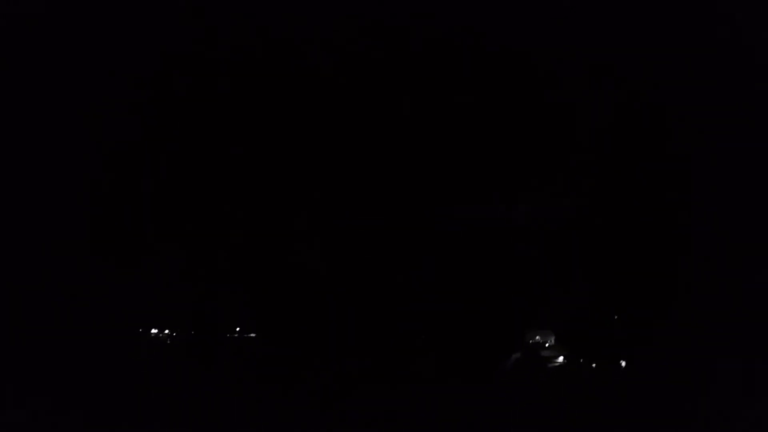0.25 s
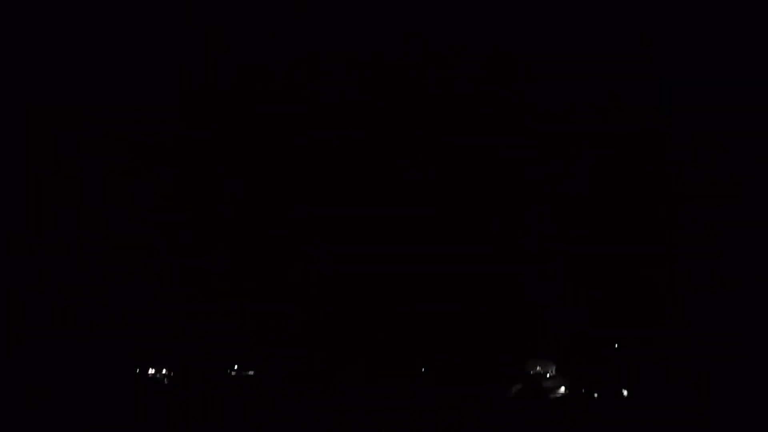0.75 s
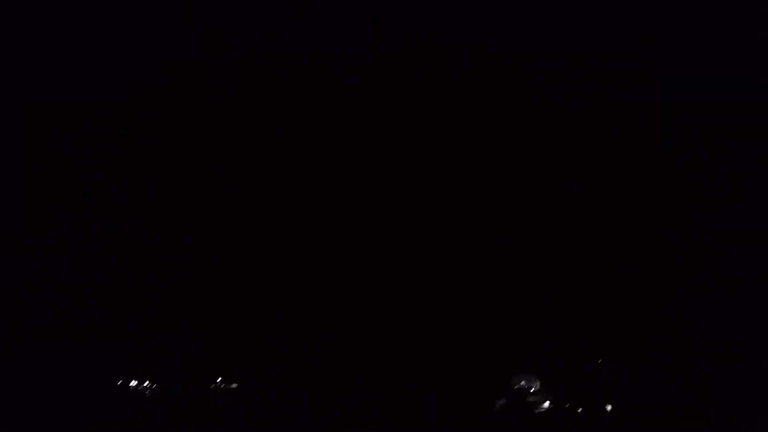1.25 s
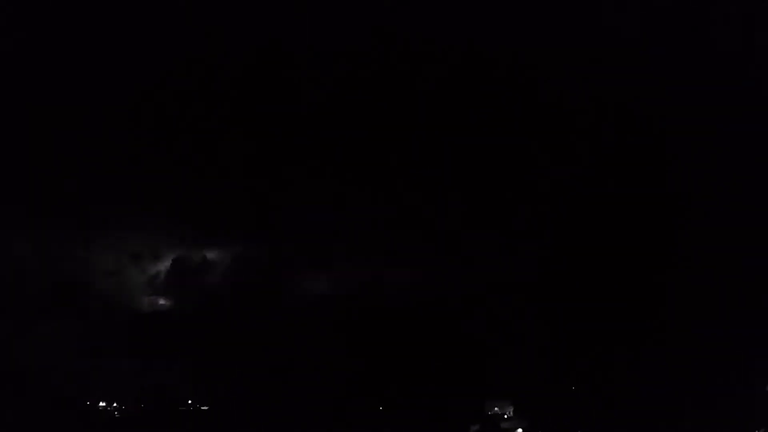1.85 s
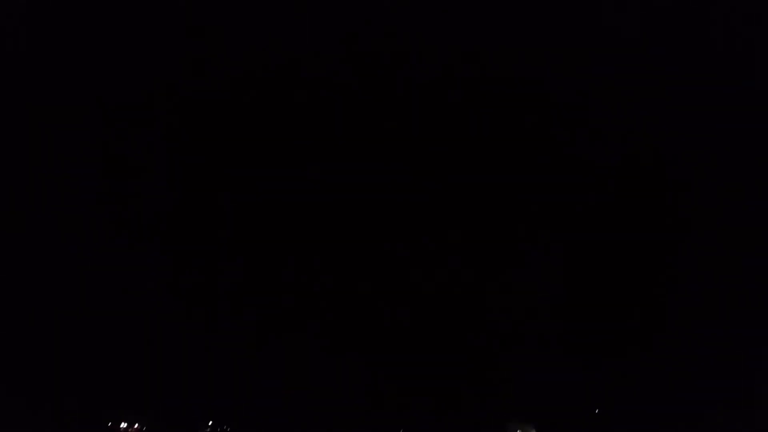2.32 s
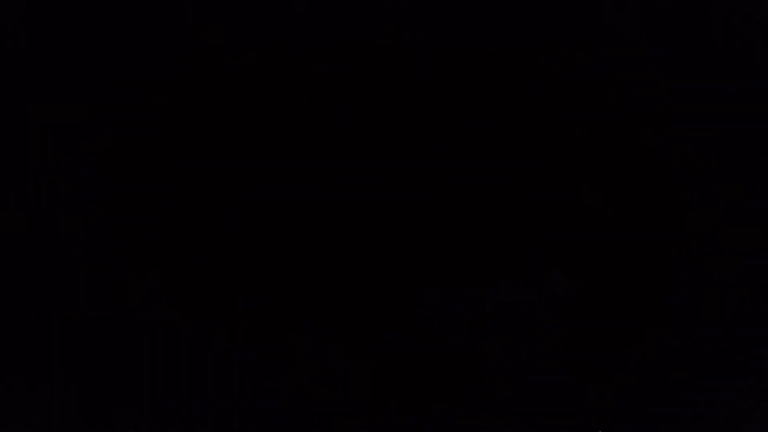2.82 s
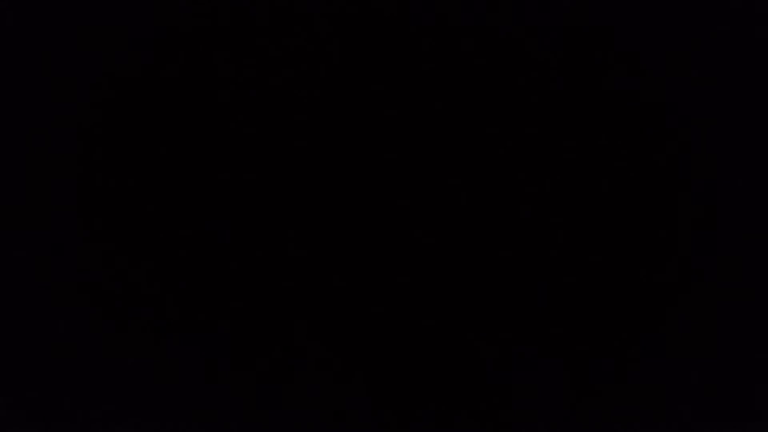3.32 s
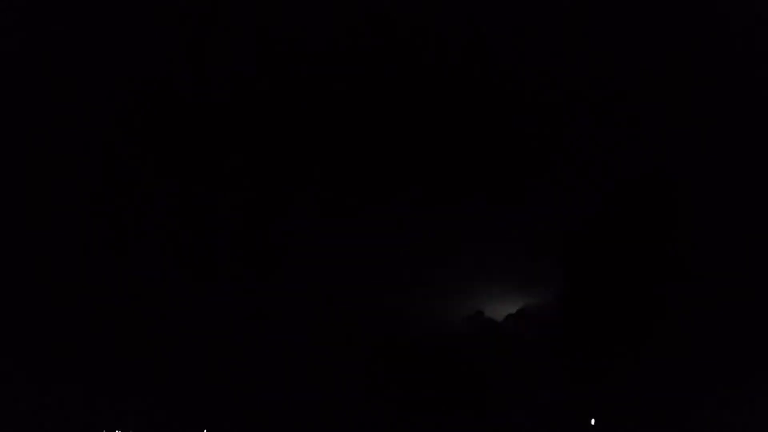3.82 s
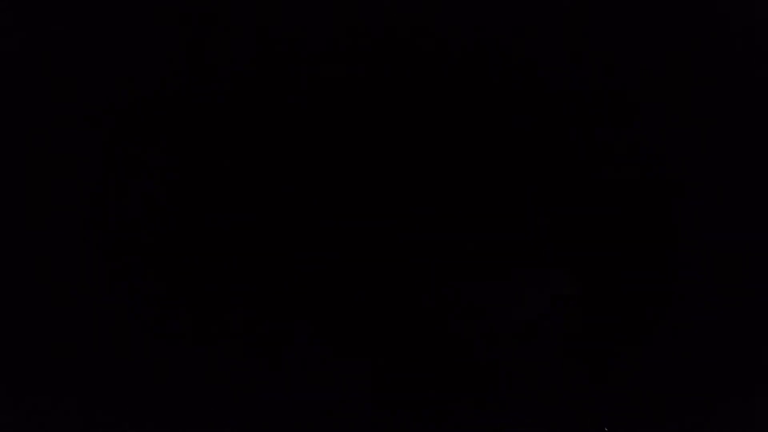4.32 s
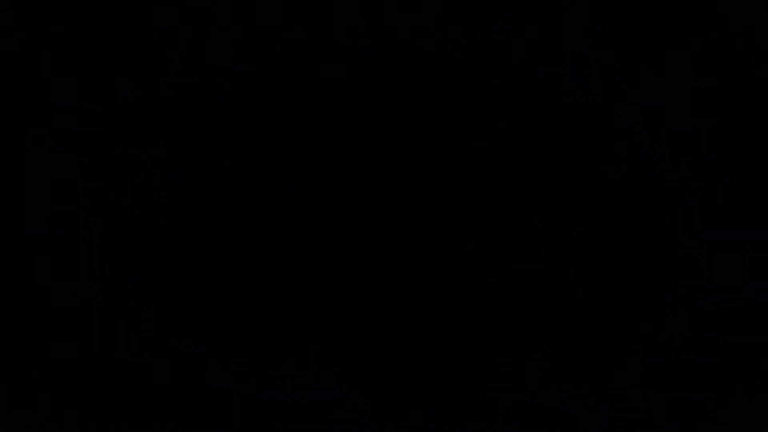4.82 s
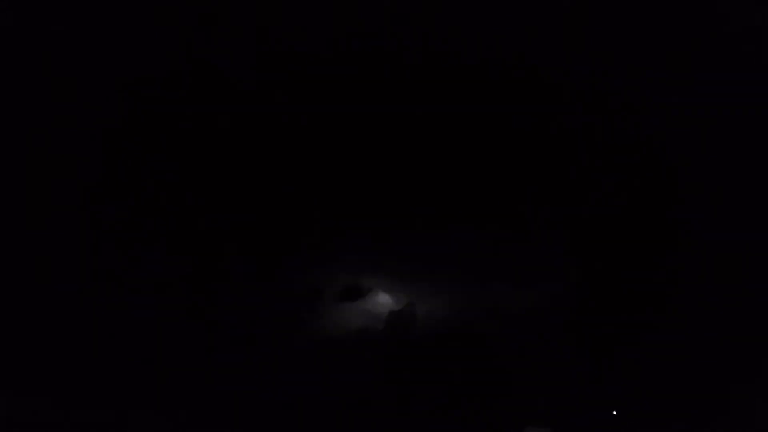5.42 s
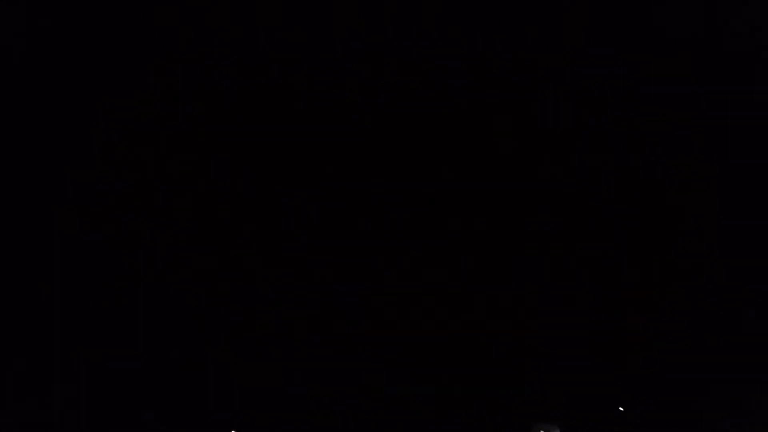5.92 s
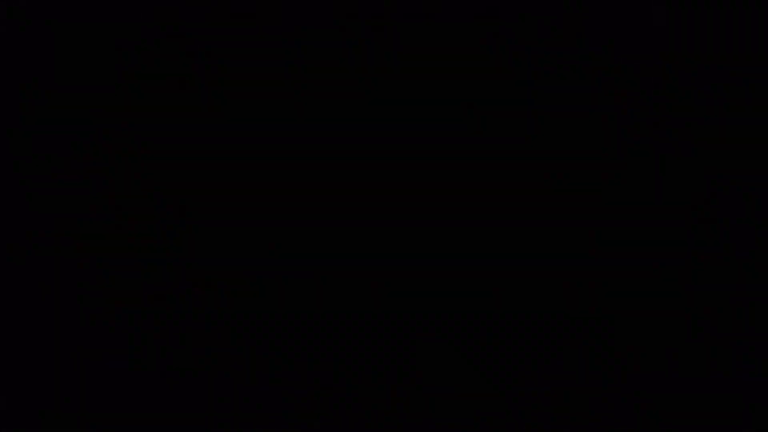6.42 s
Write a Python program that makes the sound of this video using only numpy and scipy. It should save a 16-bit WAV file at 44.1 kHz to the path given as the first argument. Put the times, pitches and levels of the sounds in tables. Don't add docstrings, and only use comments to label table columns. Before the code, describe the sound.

Night field insects hiss, buzz and chirp steadily while wind thumps the microphone, fingers tap and rub its case, and a dull far rumble continues.

```python
import sys
import numpy as np
from scipy import signal
from scipy.fft import rfft, irfft, next_fast_len
from scipy.io import wavfile
from scipy.ndimage import uniform_filter1d, map_coordinates

SR = 44100
rng = np.random.default_rng(int(sys.argv[2]) if len(sys.argv) > 2 else 0)


def nominal_scale(level):
    x = np.asarray(level, float) / 20
    return 10 ** x


def generate_wav(sig):
    pcm = np.round(np.clip(np.atleast_2d(sig).T, -1, 1) * 32767).astype(np.int16)
    wavfile.write(sys.argv[1], SR, pcm)


N = 293573
TIME = np.arange(N) / SR


def unit(x):
    return x / np.sqrt(np.mean(x ** 2, axis=-1, keepdims=True) + 1e-20)


def curves(rows):
    s, *columns = np.transpose(rows)
    return np.array([np.interp(TIME, s, column) for column in columns])


def wobble(rate):
    knots = rng.standard_normal(int(N * rate / SR) + 4)
    return map_coordinates(knots, [TIME * rate])


def rush(spectrum, alike, patchy_db):
    z = signal.stft(rng.standard_normal((2, N)), nperseg=512)[2]
    patches = uniform_filter1d(rng.standard_normal(z.shape), 6, 1)
    patches = uniform_filter1d(patches, 10, 2)
    patchy = z * nominal_scale(patchy_db * patches / patches.std())
    pair = signal.istft(patchy, nperseg=512)[1][:, :N]
    m = next_fast_len(N + 8192)
    hz, db = np.transpose(spectrum)
    log_hz = np.log(np.fft.rfftfreq(m, 1 / SR) + 1)
    gain = nominal_scale(np.interp(log_hz, np.log(hz + 1), db, -120, -120))
    a, b = unit(irfft(rfft(pair, m) * gain, m)[:, :N])
    return np.array([a, alike * a + np.sqrt(1 - alike ** 2) * b])


def add(track, s, sound):
    part = track[..., max(round(s * SR), 0):][..., :sound.shape[-1]]
    part += sound[..., :part.shape[-1]]


def grass(x, t60, wet_db):
    t = np.arange(SR // 4) / SR
    tail = rng.standard_normal((2, len(t))) * nominal_scale(-60 * t / t60)
    tail = tail / np.linalg.norm(tail[0])
    return x + nominal_scale(wet_db) * signal.fftconvolve(x, tail, axes=1)[:, :N]


def stroke(hz, fall_hz, crest, swell, length, rough, peaky=.8):
    u = np.linspace(0, 1, round(length * SR))
    drift = rough * np.cumsum(rng.standard_normal(len(u)))
    pitch = hz - fall_hz * np.abs(u - crest) ** 1.3
    phase = 2 * np.pi * (np.cumsum(pitch) / SR + rng.random())
    tone = np.sin(phase + drift) + nominal_scale(-25.5) * np.sin(3 * phase)
    return np.sin(np.pi * u ** swell) ** peaky * tone


# f/Hz, level/dB
RUMBLE_BAND = [(88, -32.5), (150, -6), (235, -13), (500, -14.5), (802, -19), (1410, -33), (2170, -35.5),
               (2850, -39.5), (3150, -46.5), (3850, -52), (4300, -48.5), (4800, -54.5), (5300, -58.5),
               (6760, -98.5), (11400, -120)]
# t/s, level/dB
RUMBLE_LEVEL = [(0.0, -52.5), (0.18, -50.5), (6.66, -52.5)]


def distance():
    level_db = curves(RUMBLE_LEVEL) + [[4.5], [5.5]] + 0.3 * wobble(3.545)
    return nominal_scale(level_db) * rush(RUMBLE_BAND, alike=0.22, patchy_db=2.0)


# f/Hz, level/dB
FROG_BAND = [(1950, -40.5), (2080, -3.5), (2160, -1), (2260, -8), (2400, -39.5)]
# start t/s, end t/s, level/dB
WHISTLES = [
    (2.21, 2.52, -75),
    (3.59, 3.95, -75),
    (4.95, 5.1, -81),
]


def frogs():
    out = nominal_scale([[-78], [-71]] + 2.5 * wobble(5)) * rush(FROG_BAND, alike=0.1, patchy_db=3.2)
    for start, end, db in WHISTLES:
        t = np.arange(round((end - start) * SR)) / SR
        flutter = 1 + 0.44 * np.sin(2 * np.pi * 22 * t)
        fade = (1 - np.exp(-t / .015)) * nominal_scale(-11 * t / t[-1]) * flutter
        tone = np.sin(2 * np.pi * 2655 * t + .6 * np.sin(2 * np.pi * 13 * t))
        add(out, start, nominal_scale([[db - 6], [db]]) * fade * tone)
    return out


# f/Hz, level/dB
KATYDID_BAND = [(5000, -85), (8500, -57), (10200, -45), (11200, -29.5), (12800, -21), (14700, -5.5),
                (15200, 0), (16000, -1)]
# t/s, level/dB
HISS = [(0.0, -53.5), (1.5, -52.5), (2.7, -53), (3.4, -53), (5.8, -52.5), (6.66, -55.3)]


def katydids():
    throb = np.sin(2 * np.pi * np.cumsum(16.6 + .8 * wobble(2)) / SR) * wobble(1.4)
    slow = np.array([wobble(9.9), wobble(9)])
    quick = np.array([wobble(60), wobble(66)])
    shiver = nominal_scale(1.1 * throb + 0.44 * slow + 0.76 * quick)
    left, right = rush(KATYDID_BAND, alike=0, patchy_db=2.5)
    shaded = signal.sosfilt(signal.butter(2, 11500, fs=SR, output="sos"), left)
    level_db = curves(HISS) + [[-6.5], [0]] + 1.9
    return nominal_scale(level_db) * unit(shiver * [shaded, right])


# f/Hz, level/dB
TREE_BAND = [(4900, -53), (5250, -16.5), (5500, -7), (5800, -0.5), (6000, -6), (6250, -19), (6500, -20),
             (6900, -15.5), (7300, -28), (7700, -63.5)]
# t/s, right level/dB, beat shift/cycles
BUZZ = [(0.25, -56, 0.1), (0.75, -55, -0.85), (2.25, -56.5, -1.1), (3.5, -57.5, -0.52), (4.4, -60, -0.75),
        (5.25, -66, -0.63), (6.25, -62, -0.16)]
# t/s, fast singer/0-1, slow singer/0-1
SOLO = [
    (0, 0.5, 0.4),
    (1.1, 0.7, 0),
    (3.9, 0.5, 0),
    (4.6, 0.1, 0.1),
    (5.8, 0.05, .55),
    (6.66, 0.3, 0.3),
]


def tree_crickets():
    right_db, shift = curves(BUZZ)
    fast, slow = np.clip(curves(SOLO), 0, 1)
    fast_beat = np.cos(2 * np.pi * (80.6 * TIME + shift))
    slow_beat = np.cos(2 * np.pi * (72.6 * TIME - .56))
    slow_double = np.cos(2 * np.arccos(slow_beat))
    pulses = fast * fast_beat + slow * (slow_beat + .5 * slow_double)
    gate = 1 + np.outer([.45, .6], pulses)
    swell = nominal_scale(0.9 * wobble(4.3))
    chorus = unit(swell * gate * rush(TREE_BAND, alike=0.092, patchy_db=0.4))
    left_db = np.full(N, -75.5)
    return nominal_scale([left_db, right_db]) * chorus


# t/s, level/dB, beat shift/cycles
TRILL = [(0.25, -67, -0.14), (0.75, -65, -0.072), (2.0, -66.5, -0.13), (3.0, -64, -0.049),
         (4.25, -65.5, -0.12), (4.75, -74, -0.21), (5.75, -65.5, -0.2), (6.25, -69, -0.25)]


def ground_cricket():
    db, shift = curves(TRILL)
    beat = 24.0 * TIME + shift + .32
    out = np.zeros((2, N))
    for start in np.flatnonzero(np.diff(np.floor(beat)) > 0):
        tone = stroke(hz=6990, fall_hz=1100, crest=.4, swell=.8, length=.03, rough=.02)
        add(out, start / SR, nominal_scale(rng.normal(0, 0.78)) * tone)
    out = unit(grass(out * [[-1], [1]], t60=.07, wet_db=-13))
    return out * nominal_scale([db - 13.5, db - .6])


# t/s, level/dB, left over right level/dB
NEAR = [(0.035, -55, -4.5), (0.586, -58, 3), (1.135, -56.5, -1), (1.693, -57.5, 0), (2.232, -56.5, -3),
        (2.782, -58.5, -2), (3.347, -56, -1), (3.91, -53.5, -8), (4.498, -60, 0), (5.037, -59, -9),
        (5.593, -57.5, -8), (6.14, -58, -9)]
# t/s after the start, level/dB
NEAR_STROKES = [
    (0, -4.5),
    (.051, -2.5),
    (.108, -1.5),
]
# t/s, level/dB
FAR = [(1.956, -67), (2.397, -71), (2.857, -69), (4.01, -66), (4.317, -66), (4.71, -70), (5.135, -66),
       (5.38, -65), (5.876, -66), (6.403, -65)]
# t/s after the start, level/dB
FAR_STROKES = [
    (0, 1.5),
    (0.053, 7.5),
    (.114, 6),
]


def field_crickets():
    out = np.zeros((2, N))
    near_luck = rng.standard_normal((len(NEAR), len(NEAR_STROKES)))
    for (start, db, left_db), luck in zip(NEAR, near_luck):
        for (after, grow_db), chance in zip(NEAR_STROKES, luck):
            tone = stroke(hz=4590, fall_hz=420, crest=0, swell=1.15, length=.034, rough=.006, peaky=1.5)
            tone = nominal_scale(db + grow_db) * tone
            add(out[0], start + after - .02, nominal_scale(left_db - 3.5 + 1.7 * chance) * tone)
            add(out[1], start + after - .018, nominal_scale(0.7) * tone)
    far_luck = rng.standard_normal((len(FAR), len(FAR_STROKES)))
    for (start, db), luck in zip(FAR, far_luck):
        for (after, grow_db), chance in zip(FAR_STROKES, luck):
            tone = stroke(hz=4360, fall_hz=220, crest=0, swell=1.2, length=.03, rough=.07)
            ports_db = db + grow_db + 2 * chance + np.array([[-22], [-10]])
            add(out, start + after - .014, nominal_scale(ports_db) * tone)
    return grass(out, t60=.14, wet_db=np.array([[-17], [-11]]))


# t/s, peak level/dB, pull before the blow/0-1.4, thud f/Hz, thud level/dB
TAPS = [(0.47, -35, .8, 300, -10), (.52, -29.5, 0.9, 314, 3), (.67, -28.5, 0.7, 300, 5),
        (0.7096, -9, 0.52, 296, 0), (0.8003, -25, .8, 300, -1), (0.9011, -4.5, 0.4, 330, -10),
        (3.7489, -17, 1.15, 200, -20), (4.706, -28.5, 0.7, 301, -10), (4.872, -31.5, .8, 300, 3.5),
        (4.9081, -15, 0.9, 400, -18), (4.9554, -12, 0.2, 380, -16), (5.047, -37, 0.6, 300, 11),
        (5.906, -37, .3, 305, 10)]
# start t/s, end t/s, level/dB, brightness f/Hz
RUBS = [(0.663, 0.725, -48, 1540), (0.899, 0.979, -45, 1320), (1.059, 1.13, -54, 1300),
        (1.263, 1.316, -46, 1300), (1.351, 1.426, -45.5, 1250), (1.469, 1.496, -46, 1000),
        (2.026, 2.1, -45, 840), (3.742, 3.772, -46, 1210), (3.863, 4.07, -51, 1310),
        (4.441, 4.496, -47, 1320), (4.537, 4.613, -37.5, 1290), (4.691, 4.728, -47, 1320),
        (4.918, 5.09, -45.5, 1420), (5.062, 5.118, -44.5, 1480), (5.88, 5.92, -53, 1010)]
# t/s, level/dB
SNAP = (4.9075, -26)


def fingers():
    out = np.zeros((2, N))
    t = np.arange(-SR // 100, SR // 20) / SR
    after = np.maximum(t, 0)
    onset = 1 - np.exp(-(after / .0008) ** 2)
    shell = signal.butter(3, [1900, 3200], "bandpass", fs=SR, output="sos")

    def spike(at):
        return np.exp(-((t - at) / .00028) ** 2)

    for s, db, pull, hz, thud_db in TAPS:
        thud = nominal_scale(thud_db - 60 * after / 0.015) * np.sin(2 * np.pi * hz * after + 0.56)
        ring = nominal_scale(-0.5 - 60 * after / 0.0033) * np.cos(2 * np.pi * 1400 * after)
        shove = nominal_scale(thud_db - 2.5 - 60 * after / 0.067) * np.sin(2 * np.pi * 75 * after)
        scratch = rng.standard_normal(len(t)) * np.exp(-((t + 0.00064) / 0.00036) ** 2)
        nail = nominal_scale(-16) * signal.sosfilt(shell, scratch)
        blow = spike(0) - pull * spike(-0.0005) + onset * (thud + ring - shove) + nail
        add(out, s + t[0], nominal_scale([[db], [db - 25]]) * blow)
    for start, end, db, bright_hz in RUBS:
        u = np.linspace(0, 1, round((end - start) * SR))
        lumps = rng.standard_normal(len(u) // 60 + 1).repeat(60)[:len(u)]
        grain = rng.standard_normal(len(u)) * nominal_scale(3 * lumps)
        case = signal.butter(3, [400, bright_hz], "bandpass", fs=SR, output="sos")
        press = np.sin(np.pi * u ** 1.35) ** 0.5
        add(out, start, nominal_scale([[db], [db - 17]]) * press * unit(signal.sosfilt(case, grain)))
    notch = signal.butter(2, [7500, 12000], "bandstop", fs=SR, output="sos")
    tick = signal.sosfilt(notch, np.exp(-np.arange(48) / .8))
    snap_s, snap_db = SNAP
    add(out, snap_s, nominal_scale([[snap_db - 9], [snap_db]]) * tick)
    return out


# t/s, left level/dB, right level/dB
WIND = [(0.0, -36.5, -35), (0.4, -39.5, -35.5), (0.65, -32.5, -37), (1.0, -35, -36.5), (1.4, -33.5, -35),
        (1.8, -24, -30), (2.0, -38.5, -34), (2.3, -38.5, -29.5), (2.9, -36, -30), (3.2, -32, -31.5),
        (3.8, -30.5, -31.5), (4.0, -37.5, -31.5), (4.35, -31.5, -31), (4.85, -33.5, -22.5), (5.4, -36, -31),
        (5.6, -34.5, -31.5), (6.0, -36, -31.5), (6.66, -38, -26)]
# f/Hz, level/dB
TURBULENCE = [(8, -31), (25, -9), (45, -2), (72, 1), (120, -3), (170, -13.5), (240, -21.5), (400, -33),
              (900, -90.5)]
# f/Hz, level/dB
GUSTY = [(120, -40.5), (170, 2), (230, -2), (330, -6), (520, -30.5), (900, -65)]
# t/s, peak level/dB, f/Hz
EDDIES_LEFT = [(0.828, -12, 82), (1.395, -20.5, 71), (1.629, -18, 128), (1.735, -26, 98), (1.802, -14, 104),
               (1.832, -13.5, 85.6), (1.864, -16, 110), (2.81, -23.5, 100), (3.077, -13, 86.4),
               (3.357, -21.5, 106), (3.495, -21.5, 125), (3.548, -20.5, 100), (3.805, -15.5, 78),
               (3.893, -18.5, 89), (4.199, -17, 109), (4.29, -15, 97), (4.331, -19.5, 84),
               (4.575, -16.5, 84.5), (4.627, -23.5, 74), (4.825, -22, 84), (4.937, -13.5, 152),
               (4.984, -15, 80.5), (5.097, -15, 72), (5.142, -17, 80.5), (5.57, -17, 85)]
# t/s, peak level/dB, f/Hz
EDDIES_RIGHT = [(2.166, -21.5, 96), (2.289, -16.5, 102), (2.601, -20.5, 115), (2.683, -17, 88),
                (3.034, -17.5, 154), (3.201, -20, 107), (3.337, -14.5, 94), (3.436, -23, 92),
                (3.596, -13.5, 91), (3.676, -16.5, 97), (4.02, -20.5, 107), (4.252, -18, 96),
                (4.383, -15.5, 141), (4.646, -15.5, 129), (4.762, -9.5, 124), (4.787, -14, 119),
                (4.833, -6, 128), (4.971, -11, 132), (5.123, -13.5, 94), (5.159, -13.5, 127),
                (5.293, -19, 85), (5.564, -18.5, 100), (6.104, -8, 109.4), (6.184, -17, 106),
                (6.336, -17.5, 98), (6.37, -14, 102), (6.59, -16, 100), (6.616, -14.5, 97)]


def wind():
    strength_db = curves(WIND) + 0.17
    lumps = unit(nominal_scale(2.6 * np.array([wobble(22), wobble(22)])))
    out = nominal_scale(strength_db) * lumps * rush(TURBULENCE, alike=0.29, patchy_db=2.0)
    gust_db = -50 + 1.72 * (strength_db + 29)
    out += nominal_scale(gust_db) * lumps * rush(GUSTY, alike=0, patchy_db=2.5)
    t = np.arange(-SR // 16, SR // 16) / SR
    for port, strong in enumerate([EDDIES_LEFT, EDDIES_RIGHT]):
        when, size, pitch = rng.random((40, 3)).T
        small_db = strength_db[port, (when * N).astype(int)] + 8 - 7 * size
        small_hz = 100 * (.75 + .5 * pitch)
        swirls = list(strong) + list(zip(when * N / SR, small_db, small_hz))
        for (s, db, hz), turn in zip(swirls, rng.random(len(swirls))):
            turns = max(0.93 - 0.02 * (db + 19.5), .3)
            puff = np.exp(-(t * hz / (turns * 0.65)) ** 2)
            swirl = 2 * np.pi * (hz * t + turn)
            thump = np.sin(swirl) + 0.16 * np.sin(2 * swirl)
            add(out[port], s + t[0], nominal_scale(db + 1.66) * puff * thump)
    return out


def scene():
    insects = katydids() + tree_crickets() + ground_cricket() + field_crickets()
    return distance() + frogs() + insects + fingers() + wind()


def band_limit(x):
    return signal.sosfilt(signal.butter(12, 15910, fs=SR, output="sos"), x)


def record(dry):
    m = next_fast_len(N + 8192)
    hz = np.fft.rfftfreq(m, 1 / SR)
    ports = nominal_scale(-14 * np.exp(-((hz - 8300) / 900) ** 4)) * (hz < 15860)
    mix = irfft(rfft(dry, m) * ports, m)[:, :N]
    return band_limit(mix)


dry = scene()
out = record(dry)
generate_wav(out)
```